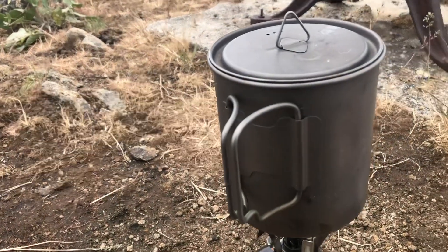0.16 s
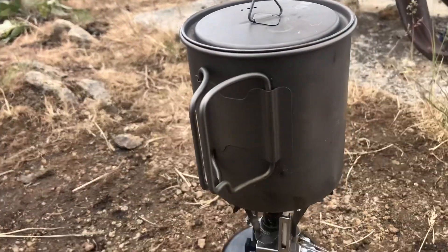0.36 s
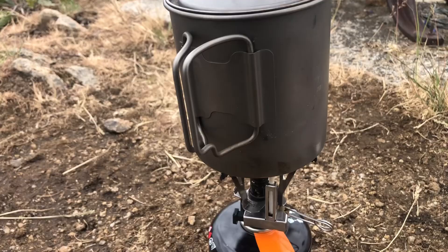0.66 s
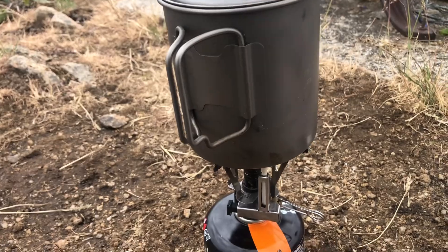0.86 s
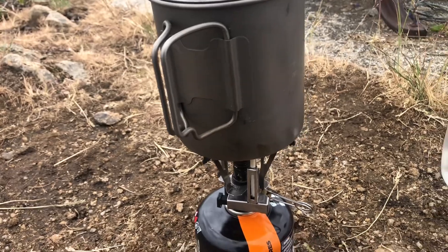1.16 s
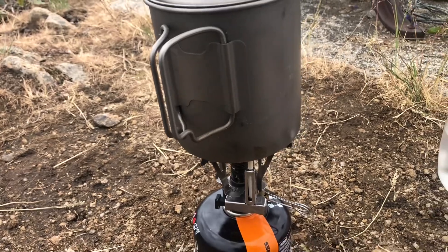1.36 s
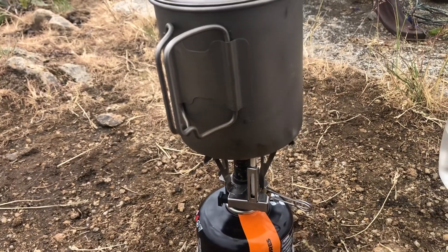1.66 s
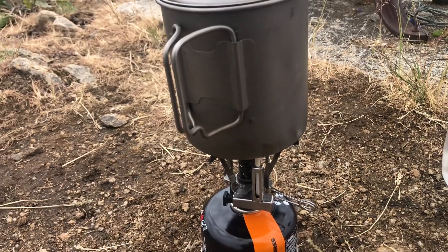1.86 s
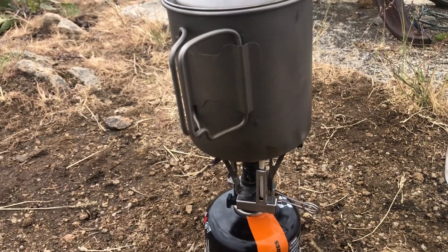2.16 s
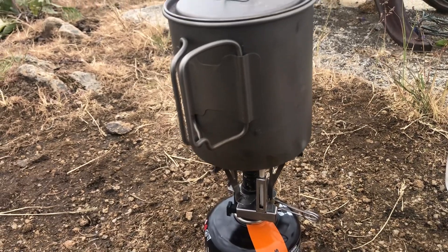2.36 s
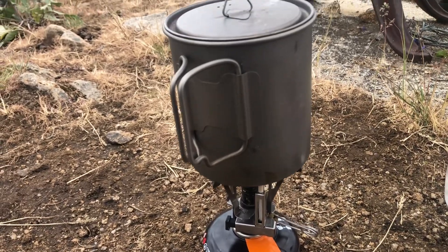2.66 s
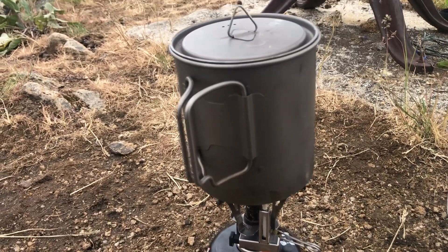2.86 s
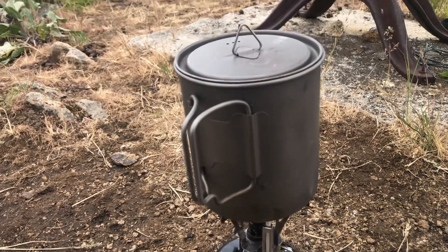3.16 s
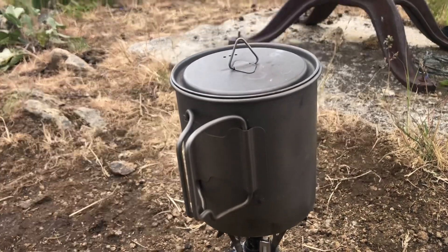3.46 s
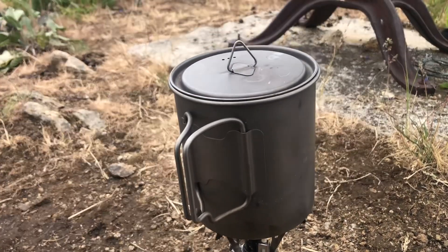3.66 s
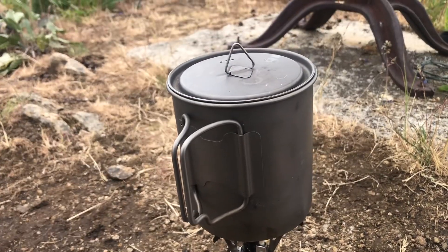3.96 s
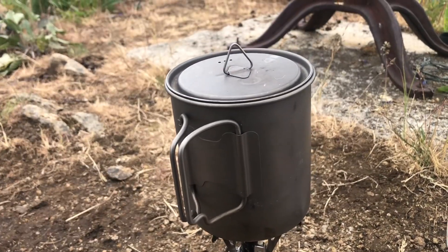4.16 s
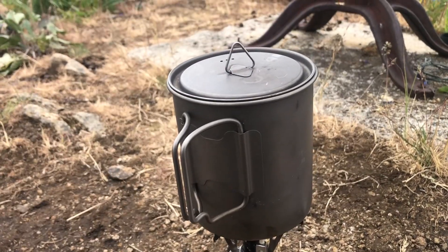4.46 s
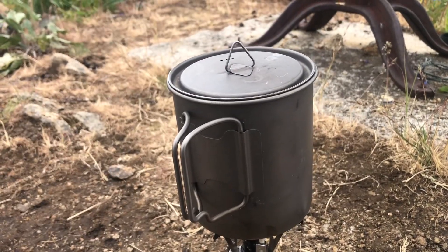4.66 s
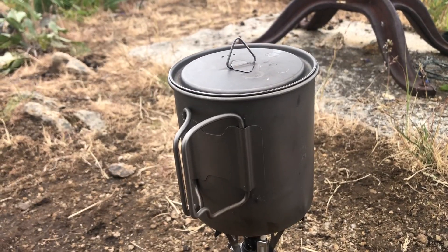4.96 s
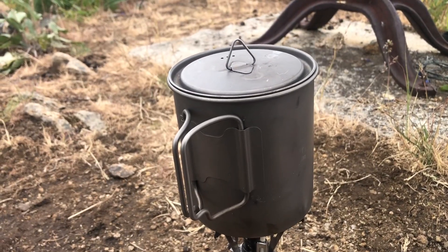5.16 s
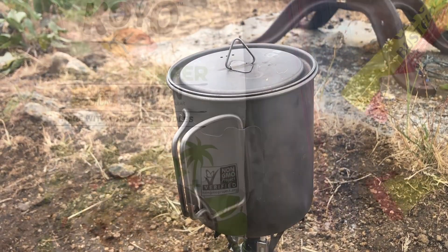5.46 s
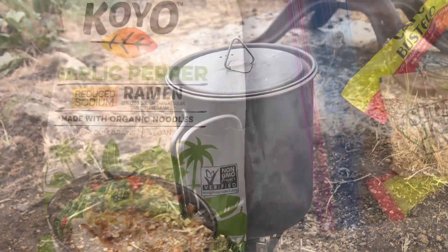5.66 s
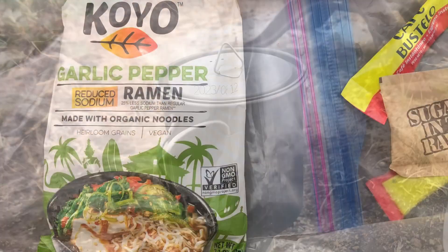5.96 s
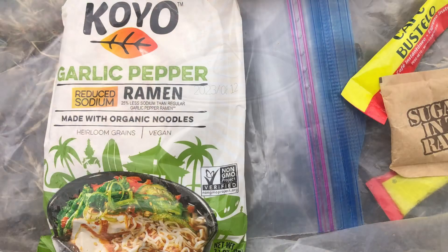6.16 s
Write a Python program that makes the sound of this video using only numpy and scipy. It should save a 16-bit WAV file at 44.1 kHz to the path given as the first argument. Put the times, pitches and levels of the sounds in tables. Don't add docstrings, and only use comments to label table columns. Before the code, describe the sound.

Close, dry outdoor sound of a camping stove flame: continuous broadband rush, strongest in the middle range, with softer airy jet hiss above and a rounded roar below. Small moving reflections from pot, canister and ground give it a hollow, slowly sliding colour. The level is nearly steady, wavers gently after four seconds, and fades smoothly to silence over the last second.

```python
import sys
import numpy as np
from scipy import signal
from scipy.fft import rfft, irfft, next_fast_len
from scipy.io import wavfile
from scipy.ndimage import uniform_filter1d, map_coordinates

SR = 44100
rng = np.random.default_rng(int(sys.argv[2]) if len(sys.argv) > 2 else 0)


def attenuation_scalar(level_db):
    decades = np.asarray(level_db, float) / 20
    return 10 ** decades


def to_wav(sig):
    pcm = np.clip(np.atleast_2d(sig), -1, 1) * 32767
    pcm = np.round(pcm).astype(np.int16)
    wavfile.write(sys.argv[1], SR, pcm.T)


N = 278103
TIME_S = np.arange(N) / SR


def along(table):
    t_s, *columns = np.transpose(table)
    return [np.interp(TIME_S, t_s, column) for column in columns]


def shape(x, gain):
    size = next_fast_len(N)
    hz = np.arange(size // 2 + 1) * SR / size + 1e-3
    return irfft(rfft(x, size) * gain(hz), size)[:N]


def unit(x):
    return x / np.sqrt(np.mean(x ** 2))


def walk(rate_hz):
    hold = int(SR / rate_hz)
    steps = np.repeat(rng.standard_normal(N // hold + 1), hold)
    slewed = uniform_filter1d(uniform_filter1d(steps, hold), hold)
    return unit(slewed[:N])


def fade_out(from_s=5.32, to_s=6.304):
    return np.clip((to_s - TIME_S) / (to_s - from_s), 0, 1)


# (t/s, level/dB)
GAS_FLOW = [(0, -0.5), (.4, 0.2), (1.1, 0.7), (1.8, -0.06), (2.3, 0.2), (2.7, 0), (3.2, 0.2), (3.8, -0.1),
            (4.1, -2), (4.33, 0), (4.5, -2), (4.68, -1), (4.83, -3), (5.0, -0.4), (5.4, -0.9), (6.3, -1.7)]


def gas_flow():
    breeze_db = 0.43 * walk(8)
    return attenuation_scalar(along(GAS_FLOW)[0] + breeze_db)


# (t/s, closeness to pot/1, lowering to burner/1, downward tilt/1)
PHONE_POSE = [(0.0, 1.1, -0.13, 0.12), (0.3, 0.82, 0.17, -0.11), (0.6, 0.34, 0.53, -0.32),
              (0.9, 0.27, 1.17, -0.06), (1.2, 0.1, 1.11, 0.39), (1.6, 0.1, 0.93, 1.11),
              (2.1, 0.05, 0.94, 1.1), (2.5, 0.13, 1.0, 0.93), (2.9, -0.02, 1.05, 0.26),
              (3.3, 0.14, 0.83, 0.09), (3.6, 0.16, 0.92, -0.18), (3.9, 0.17, -0.08, -0.17),
              (4.3, -0.1, 0.11, 0.03), (5.0, -0.08, 0.13, 0.1), (6.3, 0.02, 0.04, -0.02)]


def posed(table):
    pose = np.array(along(PHONE_POSE))
    return [rest + np.dot(change, pose) for rest, *change in table]


# (at rest/ms, change when close/ms, when lowered/ms, when tilted/ms)
ECHO_LAG_MS = [
    (0.257, 0.013, 0.006, -0.001),
    (0.643, 0.001, -0.035, -0.01),
    (0.3, -0.026, -0.006, 0.042),
    (0.715, 0.027, -0.003, 0.045),
    (0.182, -0.005, 0.037, -0.001),
    (0.472, -0.042, -0.016, -0.009),
    (0.12, -0.009, 0.034, -0.017),
    (0.649, 0.014, 0.028, -0.01),
    (0.521, -0.048, -0.014, -0.014),
    (0.996, -0.027, -0.046, -0.012),
]
ECHO_SHARE = [(0.64, -0.13, -0.16, -0.05), (0.34, -0.18, -0.23, 0.0), (1.69, -0.27, -0.44, 0.59),
              (-0.21, 0.2, 0.13, 0.01), (0.19, 0.05, 0.09, 0.15), (2.91, -0.58, 0.29, -0.24),
              (0.12, 0.11, 0.03, 0.0), (-0.28, 0.28, 0.11, -0.03), (-0.12, -0.12, 0.06, -0.04),
              (-0.09, 0.1, 0.02, -0.04)]
BENT_PATHS = (2, 5)


def echoes(x):
    bend_hz = 368
    bent = shape(x, lambda hz: 1 / (1 + 1j * hz / bend_hz))
    out = x.copy()
    for path, (lag_ms, share) in enumerate(zip(posed(ECHO_LAG_MS), posed(ECHO_SHARE))):
        shaken_ms = lag_ms * (1 + 0.006 * walk(9))
        place = np.arange(N) - shaken_ms * SR / 1000
        source = bent if path in BENT_PATHS else x
        copy = map_coordinates(source, [place], order=5, mode="mirror")
        out += share * attenuation_scalar(0.4 * walk(12)) * copy
    return out


# (f/Hz, level/dB per Hz)
FLAME_SLOPE = [(150.0, 14.3), (300.0, 17.5), (500.0, 19.0), (800.0, 22.2), (1300.0, 24.2), (2000.0, 19.2),
               (3200.0, 9.6), (5000.0, 7.2), (7000.0, 5.7), (9000.0, 1.6), (11000.0, 4.4), (12500.0, 7.8),
               (14000.0, -3.7), (15500.0, -10.6)]
# (f/Hz, width/Hz, level/dB)
POT_RINGS = [(454.9, 60.8, 1.6), (631.0, 51.3, 0.9), (750.6, 126.6, -5.9), (870.5, 70.8, 1.2),
             (2874.1, 346.7, 5.4), (4881.4, 264.0, 3.2), (7361.7, 341.4, 6.7), (11844.0, 580.6, 6.4),
             (470, 18, 0.5), (541, 35, -1.5), (590, 18, 1.7), (778, 15, -2.5), (1014, 25, -1.5),
               (1675, 130, 1.3), (2135, 34, -4)]


def flame_colour(hz):
    slope_hz, slope_db = np.transpose(FLAME_SLOPE)
    db = np.interp(np.log(hz), np.log(slope_hz), slope_db)
    for ring_hz, width_hz, ring_db in POT_RINGS:
        db = db + ring_db * np.exp(-((hz - ring_hz) / width_hz) ** 2)
    return attenuation_scalar(db) / np.sqrt(1 + (95 / hz) ** 6.0) / np.sqrt(1 + (55 / hz) ** 2.1)


def burner():
    flame = shape(rng.standard_normal(N), flame_colour)
    scatter = shape(rng.standard_normal(N), flame_colour)
    return echoes(flame) + attenuation_scalar(-18.5) * scatter


def roar_and_hiss(heard):
    split_hz, jet_hz = 900, 3500
    roar_db, hiss_db = -39.5, -43
    roar = shape(heard, lambda hz: 1 / (1 + (hz / split_hz) ** 4))
    rush = shape(heard - roar, lambda hz: 1 / (1 + (hz / jet_hz) ** 4))
    jet = heard - roar - rush
    rush_flicker_db = 0.4 * walk(11) + 1.1 * walk(70)
    jet_flicker_db = 0.5 * walk(15)
    hiss = rush * attenuation_scalar(rush_flicker_db) + jet * attenuation_scalar(jet_flicker_db)
    flutter_db = 0.21 * walk(18) + 0.22 * walk(45) + 0.32 * walk(160)
    roar = unit(roar) * attenuation_scalar(roar_db + 0.61 * flutter_db)
    hiss = unit(hiss) * attenuation_scalar(hiss_db + flutter_db)
    return roar + hiss


def scene():
    return (roar_and_hiss(burner()) * gas_flow() * fade_out())[None]


def roll_off(x):
    return signal.sosfilt(signal.butter(12, 15710, fs=SR, output="sos"), x)


def record(dry):
    return roll_off(dry)


dry = scene()
out = record(dry)
to_wav(out)
```